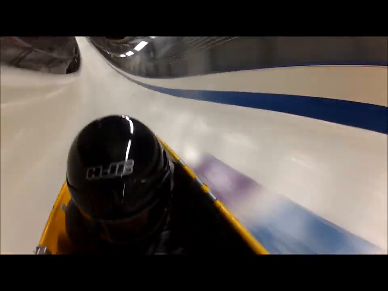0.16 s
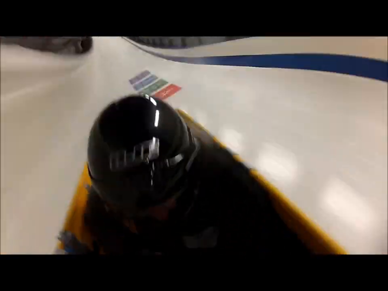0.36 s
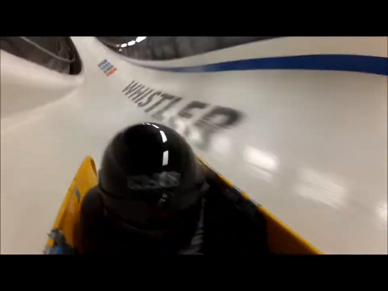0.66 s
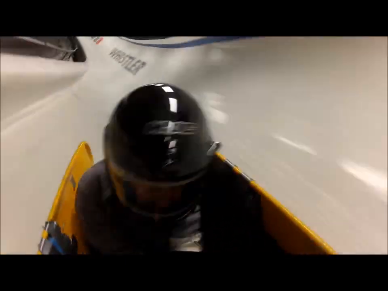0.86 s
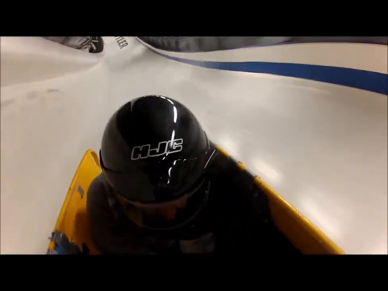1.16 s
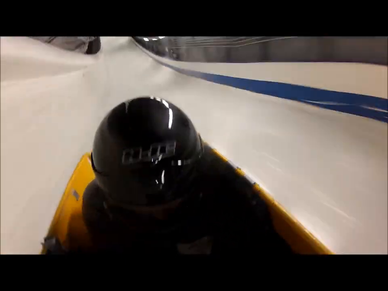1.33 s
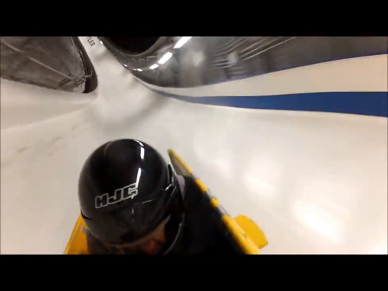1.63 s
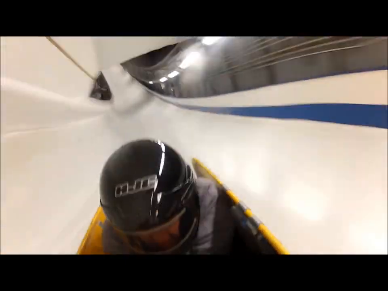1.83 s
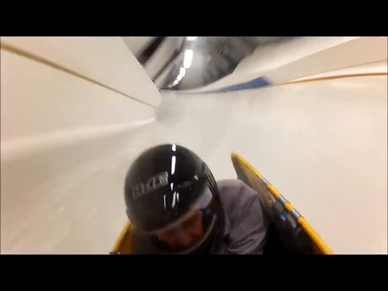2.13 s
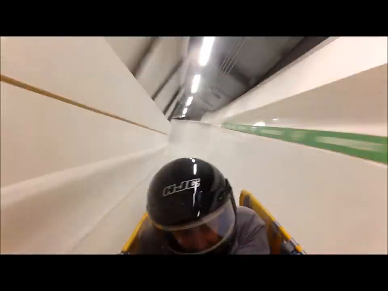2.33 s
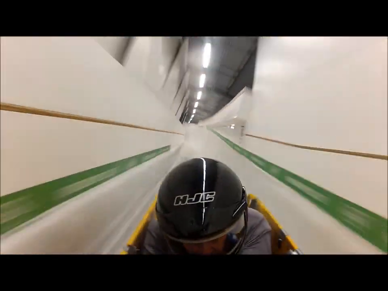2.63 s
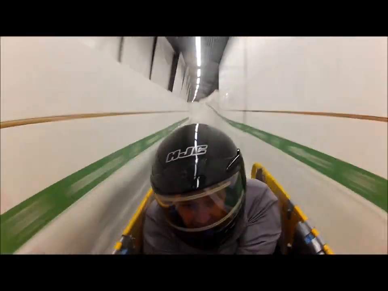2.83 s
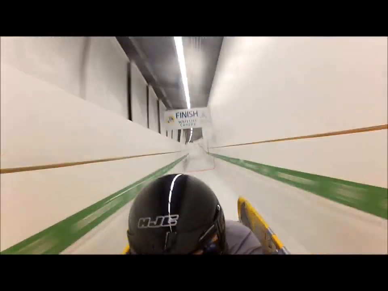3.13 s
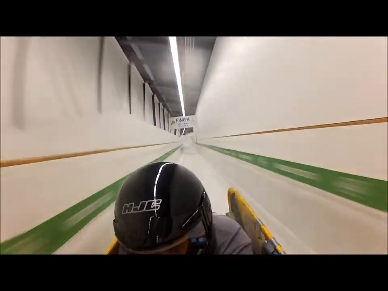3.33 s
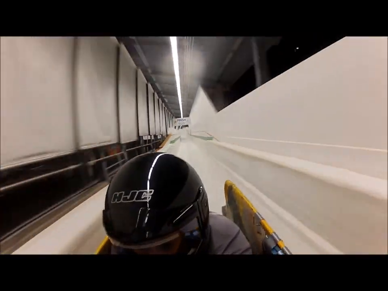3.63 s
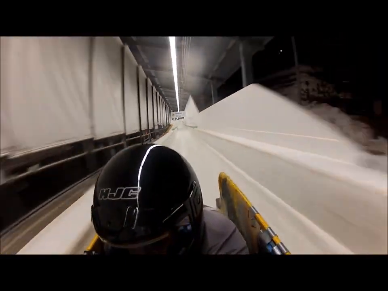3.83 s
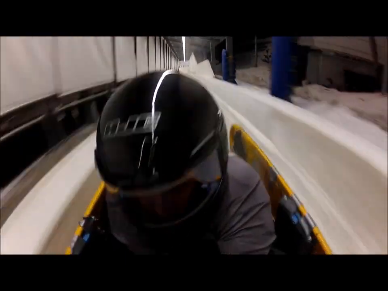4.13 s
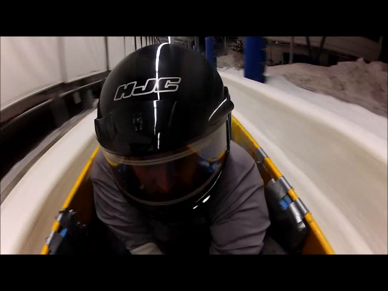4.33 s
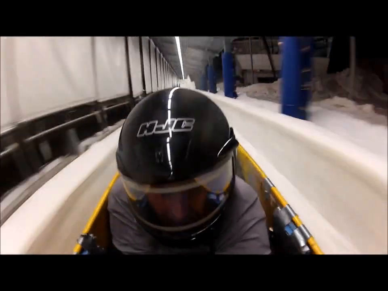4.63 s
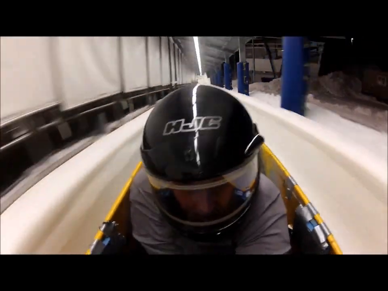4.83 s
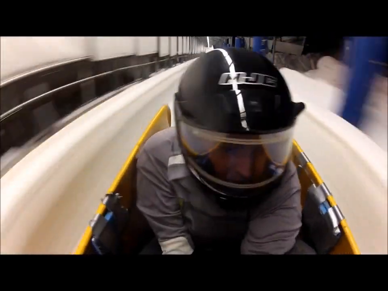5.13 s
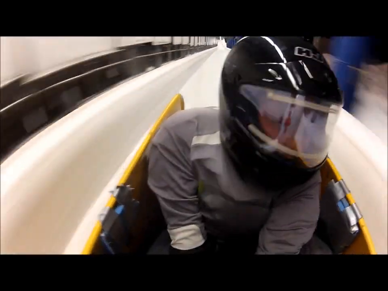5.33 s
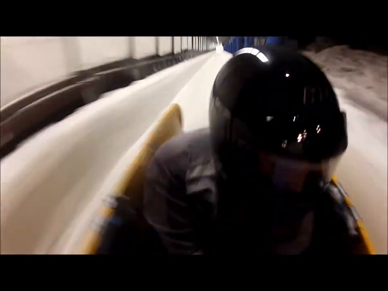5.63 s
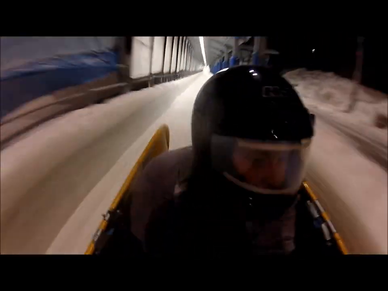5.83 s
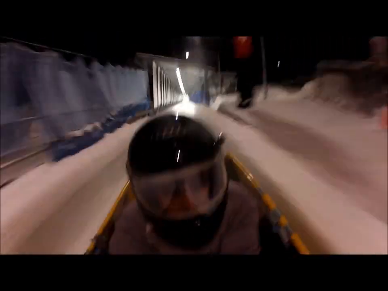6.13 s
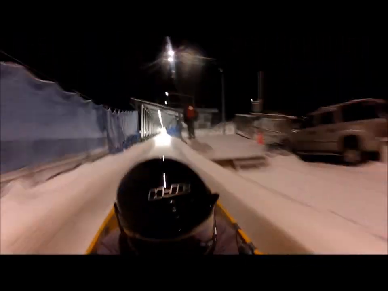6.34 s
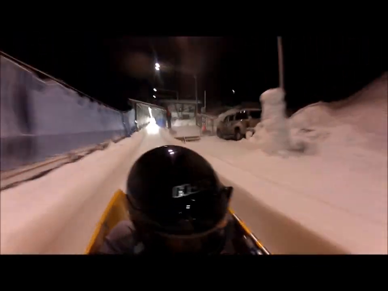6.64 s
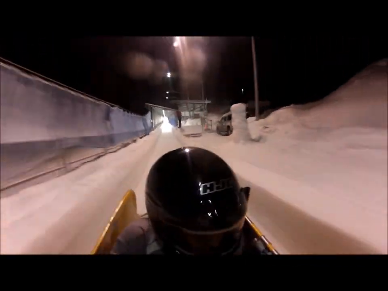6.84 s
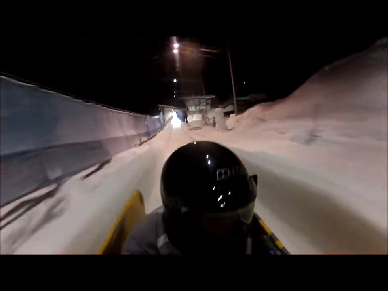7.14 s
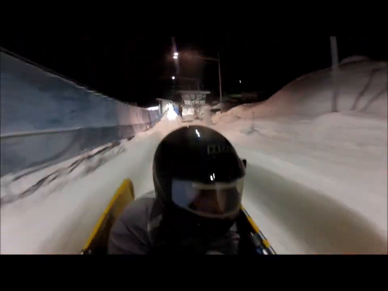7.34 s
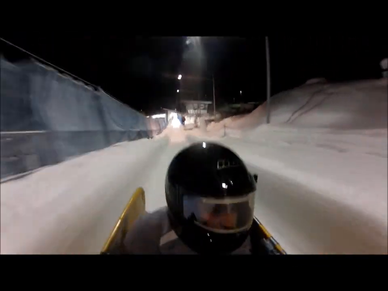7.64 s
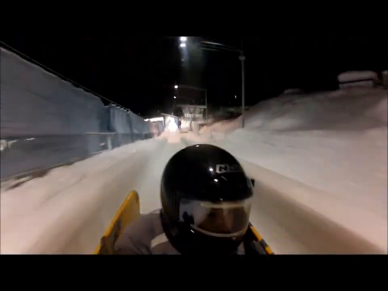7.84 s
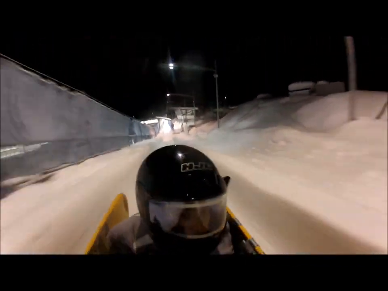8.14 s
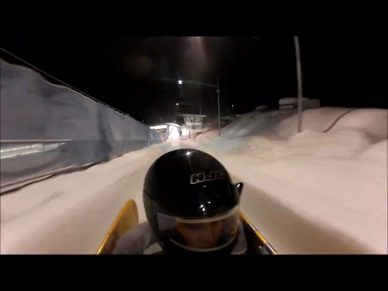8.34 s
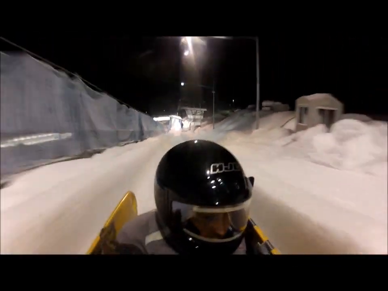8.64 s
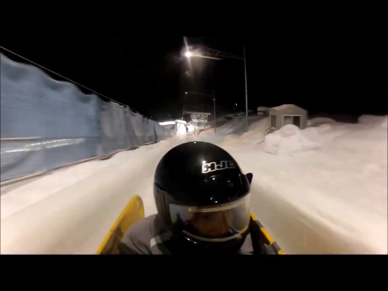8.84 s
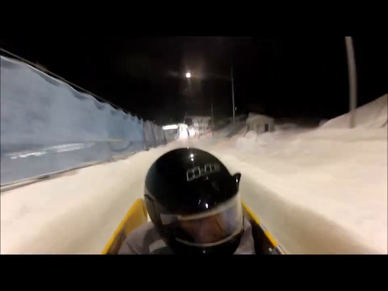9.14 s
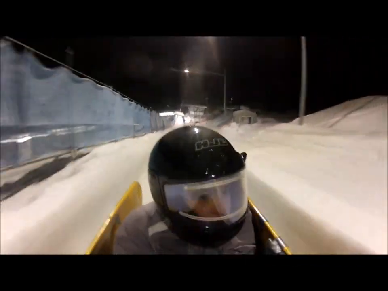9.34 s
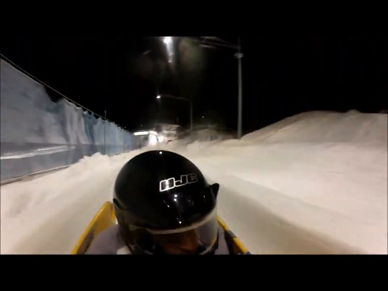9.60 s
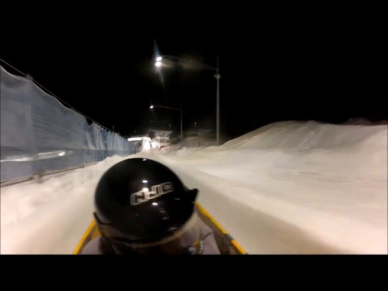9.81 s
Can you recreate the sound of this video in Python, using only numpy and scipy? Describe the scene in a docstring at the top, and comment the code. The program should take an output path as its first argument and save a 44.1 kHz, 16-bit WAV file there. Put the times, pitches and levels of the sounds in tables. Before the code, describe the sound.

Steel sled runners scrape and roar down an ice track, heavy knocks slamming the hull, then the rush eases into a gritty, crackling slow slide.

```python
"""Steel runners of a bobsled scrape, ring and spray as it races down an ice track and slows: shaped friction noise.
Place and microphone: on board, one small camera riding with the sled; both channels are alike.
The hull booms near 82 Hz (narrow noise) and bumps knock it hard (noise cracks and damped modes).
Squeaks and single cracking crumbs of ice join in (resonant noise, grains), and late thin device tones (sines).
Hard knocks overload the microphone: its gain ducks, holds and creeps back, and what slips past clips."""
import sys
import numpy as np
from scipy import signal
from scipy.fft import rfft, irfft, next_fast_len
from scipy.io import wavfile
from scipy.ndimage import uniform_filter1d, minimum_filter1d, map_coordinates

SR = 44100
rng = np.random.default_rng(int(sys.argv[2]) if len(sys.argv) > 2 else 0)


def inscribe(sig):
    """Save sig as 16-bit PCM at rate SR to the path in sys.argv[1].

    A 1-D sig is mono; a 2-D sig holds one channel per row.
    Samples are clipped to [-1, 1] before scaling.
    """
    pcm = np.round(np.clip(np.atleast_2d(sig).T, -1, 1) * 32767)
    wavfile.write(sys.argv[1], SR, pcm.astype(np.int16))


N = 439677


def amp(db):
    """Decibels to gain."""
    return 10 ** (np.asarray(db) / 20)


def unit(x):
    """x at rms 1."""
    return x / np.sqrt(np.mean(x ** 2) + 1e-20)


def noise(shape=N):
    """White noise."""
    return rng.standard_normal(shape)


def curves(rows):
    """One value per sample for each column after the time."""
    times, *columns = np.transpose(rows)
    return [np.interp(np.arange(N) / SR, times, column) for column in columns]


def wobble(rate):
    """A smooth random curve, rate knots a second."""
    knots = noise(int(N * rate / SR) + 4)
    return map_coordinates(knots, [np.arange(N) * rate / SR])


def swells(rows, edge=2.6):
    """A rise in dB over each (middle, length, dB) stretch; a higher edge makes its flanks steeper."""
    t = np.arange(N) / SR
    return sum(db * np.exp(-np.abs(2 * (t - s) / length) ** edge) for s, length, db in rows)


def filtered(x, response):
    """x times a response of frequency."""
    size = next_fast_len(len(x) + 8192)
    hz = np.fft.rfftfreq(size, 1 / SR)
    return irfft(rfft(x, size) * response(hz), size)[:len(x)]


def coloured(x, spectrum):
    """x shaped by (Hz, dB) points, at rms 1."""
    hz, db = np.transpose(spectrum)
    return unit(filtered(x, lambda f: amp(np.interp(np.log(f + 1), np.log(hz), db))))


def resonant(x, peaks):
    """x through (Hz, width, dB) resonances, at rms 1."""
    def response(f):
        return sum(amp(db) * 1j * f * width / (centre * centre - f * f + 1j * f * width)
                   for centre, width, db in peaks)
    return unit(filtered(x, response))


def ringing(modes, t):
    """Damped sines from (Hz, dB, t60) modes."""
    return sum(amp(db - 60 * t / t60) * np.sin(2 * np.pi * hz * t) for hz, db, t60 in modes)


def crunch(rate, share):
    """Friction noise: a smooth rush plus chips of breaking ice, rate a second, with a share of the power."""
    chips = (rng.random(N) < rate / SR) * rng.uniform(-1.07, 1, N)
    share = np.clip(share, 0, 1)
    return np.sqrt(1 - share) * noise() + np.sqrt(share) * unit(chips)


def steady(x, size=6615):
    """x with its swells evened out over 0.15 s."""
    return x / np.sqrt(np.abs(uniform_filter1d(x ** 2, size)) + 1e-9)


def patchy(x, depth_db):
    """x with short random patches of gain, each about 1 kHz wide and 15 ms long, at rms 1."""
    z = signal.stft(x, nperseg=256)[2]
    field = uniform_filter1d(noise(z.shape), size=6, axis=0)
    field = uniform_filter1d(field, size=5, axis=1)
    return unit(signal.istft(z * amp(depth_db * unit(field)))[1][:N])


def add(track, s, sound):
    """Mix a sound into the track at time s."""
    part = track[round(s * SR):][:len(sound)]
    part += sound[:len(part)]


# change of the runners from racing to slow sliding: (time [s], share [0-1])
SLOWING = [(0, 0), (5, 0.23), (6.5, 0.3), (7.8, 0.61), (9, 0.8)]


def slowness():
    """0 while racing, 1 at a slow slide."""
    return np.clip(curves(SLOWING)[0], 0, 1)


# base level of the runners' scrape on smooth ice: (time [s], level [dB])
GLIDE = [(0, -19.5), (2, -21.5), (3.7, -23), (6.2, -24), (7.2, -27.5), (8.6, -30.5), (9, -28.5), (10, -28)]
# stretches of rough ice: (middle [s], length [s], rise before a layer's share [dB])
ROUGH_ICE = [(.04, 0.13, 3.5), (.52, 0.17, 5.5), (1.4, 0.53, 6), (2.92, 0.1, 4.5), (4.3, .24, 13),
             (4.58, 0.32, 12.5), (5.53, 0.86, 12.5), (6.62, 0.09, 6)]


def level_db(law):
    """A layer's level: it follows the glide, fades as the sled slows and rises on rough ice."""
    over_db, slow_loss_db, rough_share = law
    return curves(GLIDE)[0] + over_db - slow_loss_db * slowness() + rough_share * swells(ROUGH_ICE)


# grit against the glide: (offset [dB], loss at a full slow-down [dB], share of the rough ice's rise)
GRIT_LAW = (-7, 6.2, 0.025)
# sideways skids that shave more grit off the ice: (middle [s], length [s], rise [dB])
SKIDS = [(2.98, 0.66, 5.5), (4.27, 0.18, 5.5), (4.57, 0.29, 3.5), (4.88, 0.085, 9), (5.42, 0.5, 5.5),
         (5.69, 0.094, 9), (7.92, 0.65, 5), (9.1, .24, 2.5), (9.7, 0.67, 5.5)]


def grit_level_db():
    """The grit follows the glide and rises where the sled skids sideways."""
    return level_db(GRIT_LAW) + swells(SKIDS)


# thin tones of the device, 2 kHz and its odd multiples: (frequency [Hz], level [dB])
DEVICE_TONES = [(2000, -30.5), (6000, -44), (10000, -45.5), (14000, -47)]


def device_tones(skirt_db=-9):
    swell, = curves([(8.55, 0.074), (8.8, 1), (9.5, 1), (9.75, 0.71), (10, 0.74)])
    flutter = resonant(noise(), [(83.6, 16, 0)])
    flutter = flutter + amp(skirt_db) * coloured(noise(), [(60, 2), (250, -6), (900, -40)])
    t = np.arange(N) / SR
    tones = sum(amp(db) * np.sin(2 * np.pi * hz * t) for hz, db in DEVICE_TONES)
    return swell * flutter * tones


def crumbs(count=110, start_s=6, over_grit_db=-0.5, spread_db=3, centre_hz=3600, life_s=0.0035):
    """At low speed single crumbs of ice crack under the runners, each at its own pitch, louder on gritty ice."""
    track, t = np.zeros(N), np.arange(SR // 40) / SR
    shape = t / life_s * np.exp(1 - t / life_s)
    grit_db = grit_level_db()
    for when, size, pitch in rng.random((count, 3)):
        s = start_s + when * (N / SR - start_s)
        # up to an octave either side of the centre
        hz = centre_hz * 2 ** (2 * pitch - 1)
        spectrum = [(hz / 3, -30), (hz / 2.3, -8), (hz, 0), (hz * 1.3, -9), (hz * 4, -26)]
        grain = coloured(noise(len(t)), spectrum)
        grain_db = grit_db[int(s * SR)] + over_grit_db + spread_db * (2 * size - 1.0)
        add(track, s, amp(grain_db) * shape * grain)
    return track


# steel catching on the ice; narrow ones squeak, wide ones scratch:
# (time [s], level [dB], frequency [Hz], width [Hz])
SQUEAKS = [(2.799, -18, 4050, 300), (2.822, -20.5, 4080, 600), (3.249, -23, 3670, 2000),
           (4.199, -18, 4470, 170), (4.864, -19, 3140, 2500), (5.671, -21, 3470, 2000),
           (5.785, -27, 4470, 200), (6.303, -26.5, 3620, 2000), (6.434, -20, 4340, 200),
           (6.585, -17.5, 2470, 800), (6.695, -21, 2800, 2000), (6.727, -26, 3930, 400),
           (7.204, -20, 4420, 150), (8.167, -21, 1410, 600), (9.07, -29, 3500, 2500),
           (9.143, -25.5, 3280, 2000), (9.67, -26.5, 3060, 2500)]


def squeaks(rise_s=0.0061, upper_hz=7650, upper_db=-8, clean_hz=230):
    """Steel sticks and slips for a moment, in one rough mode and the edge's high overtone."""
    track, t = np.zeros(N), np.arange(SR // 10) / SR
    shape = (t / rise_s) ** 2 * np.exp(2 - 2 * t / rise_s)

    def rough_mode(hz, width):
        narrow = resonant(noise(len(t)), [(hz, width, 0)])
        return resonant(narrow, [(hz, 4 * width, 0)])

    for s, db, hz, width in SQUEAKS:
        low = rough_mode(hz, width)
        high = rough_mode(upper_hz, width)
        # only a clean squeak, close under the overtone, drives it well
        drive = amp(upper_db) * (2 * hz / upper_hz) ** 2 * np.sqrt(clean_hz / width)
        add(track, s, amp(db) * shape * (low + drive * high))
    return track


# bumps in the track: (time [s], hull swing [dB], crack before a 9 dB cut [dB],
# strongest ring [Hz], dull panel knock [dB])
BUMPS = [(0.1301, 2, 9.5, 1810, -7), (0.75, -1.5, -22, 1220, -22), (0.853, 10, 10, 1744, -5),
         (1.7493, 11.5, 12, 1240, -2), (2.021, 6, 11, 1780, -1), (2.064, 8, 3, 1700, -24),
         (2.3695, 5.5, 6, 2140, -9.5), (2.417, 11.5, 5, 2250, -21), (2.464, 0.5, 0, 1540, -24),
         (2.512, -1.5, -4, 1570, -16), (2.566, 6.5, -11, 1300, -19), (2.621, 12, -8, 1300, -23),
         (2.691, 5, -17, 1310, -32), (4.292, -12, -24, 1800, -10.5), (4.357, -3.5, -26, 1800, -14),
         (5.172, 6.5, -20, 1200, -18), (5.574, -1.5, -27, 1700, -24), (5.821, -3, -23, 1700, -25),
         (7.5405, 8, 6, 1186, 0)]
# the hull's low modes: (frequency [Hz], level [dB], t60 [s])
HULL_MODES = [(82.6, 2.5, 0.22), (39.5, -11.5, 0.13), (136.5, -6, 0.076), (202, -18, 0.055),
              (273, -20.5, 0.072)]
# the body panel's short modes: (frequency [Hz], level [dB], t60 [s])
PANEL_MODES = [(383, -3.5, 0.019), (614, -9.5, 0.023)]
# the frame's answer to a blow: (frequency [Hz], relative level [dB per Hz])
FRAME_SPECTRUM = [(80, -4), (180, 2.5), (400, -9), (750, -13.5), (1200, -0.5), (2200, 1.5), (2800, -11.5),
                  (3600, -6.5), (6000, -41), (8400, -13), (15000, -26.5)]
# the shell's dull thud under a blow: (frequency [Hz], relative level [dB per Hz])
THUD_SPECTRUM = [(25, -14), (60, -2), (130, 0), (250, -11), (450, -12), (900, -44)]


def bumps(crack_s=0.0056, tail_db=-22, tail_t60=0.076, ring_db=2, ring_t60=0.025,
          give_s=0.0044, thud_db=0, thud_t60=0.064):
    """Each bump cracks briefly through the frame, thuds in the shell and panel and sets the hull swinging."""
    track, t = np.zeros(N), np.arange(SR // 2) / SR
    # the heavy hull gives way more slowly than the frame
    give = 1 - np.exp(-t / give_s)
    swing = -give * ringing(HULL_MODES, t)
    contact = np.exp(-(t / crack_s) ** 4) + amp(tail_db - 60 * t / tail_t60)
    thud_decay = amp(thud_db - 60 * t / thud_t60)
    panel = ringing(PANEL_MODES, t)
    for s, swing_db, crack_db, hz, panel_db in BUMPS:
        crack = contact * coloured(noise(len(t)), FRAME_SPECTRUM)
        crack = crack + ringing([(hz, ring_db, ring_t60)], t)
        thud = give * thud_decay * coloured(noise(len(t)), THUD_SPECTRUM)
        knock = amp(swing_db) * swing + amp(crack_db - 9) * crack + amp(panel_db) * (panel + thud)
        add(track, s, knock)
    return track


# hull boom and low rumble against the glide:
# (offset [dB], loss at a full slow-down [dB], share of the rough ice's rise)
BOOM_LAW = (-0.25, 0.81, 0.49)
RUMBLE_LAW = (-8, 0, 1)
# dips in the track that load the hull and make it boom: (middle [s], length [s], rise [dB])
DIPS = [(.03, 0.12, 4.5), (.83, 0.28, 11.5), (2.7, .2, 10), (3.46, 0.12, 7), (4.56, 0.11, 5.5),
        (4.99, 0.1, 8), (5.69, .26, 8.5), (6.78, 0.1, 7.5), (8.03, 0.11, 5)]
# their spectra: (frequency [Hz], relative level [dB per Hz])
BOOM_SPECTRUM = [(15, -27), (25, -26), (40, -9), (62, -14), (73, -11.5), (82, 6.5), (91, -7.5),
                 (110, -19.5), (150, -24.5), (250, -57)]
RUMBLE_SPECTRUM = [(59, -40), (100, -8), (113, -3), (134, -8), (227, -11), (294, -12), (496, -21.5),
                   (600, -25.5), (696, -33), (800, -33.5), (1040, -53), (1760, -120)]


def hull(load_db):
    """Uneven ice shakes the hull: dips make it boom, and rough ice raises its rumble most."""
    boom_db = level_db(BOOM_LAW) + swells(DIPS) + 1.35 * wobble(11)
    rumble_db = level_db(RUMBLE_LAW) + 1.0 * wobble(9)
    boom = amp(boom_db) * steady(coloured(noise(), BOOM_SPECTRUM))
    rumble = amp(rumble_db + load_db) * coloured(crunch(rate=150, share=0.32), RUMBLE_SPECTRUM)
    return boom + rumble


# scrape against the glide: (offset [dB], loss at a full slow-down [dB], share of the rough ice's rise)
SCRAPE_LAW = (-0.57, 0, 0.41)
# level of the runners' ring: (time [s], level [dB])
SINGING = [(0, -26.5), (1, -26.5), (1.5, -24.5), (2.3, -32.5), (4, -30), (5.1, -28.5), (5.4, -40),
           (6.1, -33), (7.4, -39.5), (10, -50.5)]
# the runners' ring, then that of the slow slide: (frequency [Hz], width [Hz], relative level [dB])
RUNNER_MODES = [(289, 71, -11.5), (594, 55, -9.5), (908, 31.7, 0)]
SLOW_RUNNER_MODES = [(267, 34, 3.5), (592, 20, 2.5), (1340, 41, 1), (5430, 800, -20)]
# the steel's high modes: (frequency [Hz], width [Hz], relative level [dB])
EDGE_MODES = [(3680, 520, 0.5), (4480, 110, -0.5), (7540, 190, -5.5), (8330, 280, -2.5), (9900, 630, -6.5),
              (10700, 77, -10)]
# spectra of the scrape at speed, the slow scrape, the grit and the fine ice spray:
# (frequency [Hz], relative level [dB per Hz])
RACING_SPECTRUM = [(410, -37), (700, -14.5), (795, -10), (910, -8.5), (996, -7), (1270, -2), (1460, -8.5),
                   (1740, -1), (2030, -4), (2320, -2.5), (2840, -18.5), (3000, -16), (3900, -26),
                   (6600, -120)]
SLIDING_SPECTRUM = [(410, -54), (700, -26), (851, -15), (882, -15.5), (1010, -30), (1120, -3), (1290, -0.5),
                    (1370, -1), (1450, -11), (1580, 0.5), (1800, -1.5), (1890, -0.5), (2150, -2),
                    (2320, -3), (3000, -21.5), (3900, -42), (6600, -120)]
GRIT_SPECTRUM = [(1530, -8), (2600, -3.5), (2920, -5.5), (3570, -1), (4190, -6.5), (4550, -6.5),
                 (4890, -11.5), (5340, -11), (5910, -32), (6200, -52.5), (8060, -34), (13600, -120)]
SPRAY_SPECTRUM = [(3530, -30), (6000, -8), (7340, -6), (8320, -3), (9010, -7), (9900, 1.5), (10500, -3.5),
                  (11500, -14.5), (11600, -23), (12300, -16), (13400, -7.5), (14000, 0.5), (14700, -8),
                  (15400, -12.5)]


def runners(load_db):
    """Steel rubbing on ice scrapes, rings, grinds off grit and throws spray."""
    slow = slowness()
    scrape_db = level_db(SCRAPE_LAW) + .5 * wobble(9.6)
    grit_db = grit_level_db() + .5 * wobble(7.1)
    # the slower the sled, the more the edges bite in separate chatters
    bite_db = (0.73 + 1.3 * slow) * (wobble(45) + wobble(220))

    racing = patchy(coloured(crunch(rate=700, share=0.21), RACING_SPECTRUM), depth_db=1.07)
    sliding = patchy(coloured(crunch(rate=500, share=0.13), SLIDING_SPECTRUM), depth_db=1.8)
    sliding = sliding + amp(-9.5) * resonant(noise(), SLOW_RUNNER_MODES)
    # crossfade in power from racing to sliding
    scrape = amp(scrape_db + load_db) * (np.sqrt(1 - slow) * racing + np.sqrt(slow) * sliding)

    ring = amp(curves(SINGING)[0] + load_db) * resonant(noise(), RUNNER_MODES)
    grinding = patchy(coloured(crunch(rate=450, share=0.085), GRIT_SPECTRUM), depth_db=1.5)
    grit = amp(grit_db + load_db + bite_db) * grinding

    # spray grows with both scrape and grit, and rings the steel's high modes
    fizz = coloured(crunch(rate=1500, share=0.3), SPRAY_SPECTRUM)
    fizz = fizz + amp(-4.0) * resonant(noise(), EDGE_MODES)
    spray = amp((scrape_db + grit_db) / 2 - 6.0 + load_db + bite_db) * fizz
    return scrape + ring + grit + spray


def gliding():
    """The load on the runners flutters, and the rumble and all friction follow it together."""
    load_db = 1.04 * wobble(22) + 0.58 * wobble(130)
    return hull(load_db) + runners(load_db)


def scene():
    """All the sled's sounds reach one microphone on board; the device adds its tones."""
    sled = crumbs() + squeaks() + bumps() + gliding()
    mono = device_tones() + sled
    return np.array([mono, mono])


def bass_image(x, hz=12000, db=-31):
    """The recorder's faint image of the bass around 12 kHz, strongest under heavy thumps."""
    bass = filtered(x, lambda f: 1 / (1 + (f / 150) ** 4))
    return amp(db) * bass * np.sin(2 * np.pi * hz * np.arange(N) / SR)


def auto_gain(x, ceiling_db=-1.0, bass_db=-4, attack_s=0.0036, release_db_per_s=68, hold_size=1601):
    """Peaks over the ceiling pull the gain down within milliseconds; it holds, then creeps back."""
    # the detector is a little deaf to bass, so heavy thumps clip
    sensed = filtered(x.mean(axis=0), lambda hz: amp(bass_db / (1 + (hz / 250) ** 2)))
    over_db = np.maximum(20 * np.log10(np.abs(sensed) + 1e-9) - ceiling_db, 0)
    # highest overshoot of the last 36 ms
    held_db = -minimum_filter1d(-over_db, hold_size, origin=hold_size // 2)
    # a running maximum on a rising ramp lets the cut fall only at the release rate
    ramp_db = release_db_per_s * np.arange(N) / SR
    cut_db = np.maximum.accumulate(held_db + ramp_db) - ramp_db
    pole = np.exp(-1 / (attack_s * SR))
    return x * amp(-signal.lfilter([1 - pole], [1, -pole], cut_db))


# bands the camera housing swallows: (centre [Hz], width [Hz], gain [dB])
HOUSING = [(6015, 360, -8.5), (11770, 720, -6.5)]


def housing(hz):
    """The housing's gain at each frequency: a smooth notch in each band."""
    return amp(sum(db * np.exp(-((hz - centre) / width) ** 2) for centre, width, db in HOUSING))


# the sound cuts out briefly: (start [s], end [s])
CUT_OUT = (6.932, 6.996)
TOP_HZ = 15400  # nothing is heard from here up


def record(dry):
    """Gain control, clipping, a brief cut-out, a faint 12 kHz image of the bass, the housing and the band limit."""
    t = np.arange(N) / SR
    live = np.where((t > CUT_OUT[0]) & (t < CUT_OUT[1]), amp(-44.5), 1)
    wet = auto_gain(dry).mean(axis=0)
    wet = live * wet / (1 + wet ** 8) ** (1 / 8)
    mono = filtered(wet + bass_image(wet), lambda hz: housing(hz) * (hz < TOP_HZ))
    return np.array([mono, mono])


dry = scene()
out = record(dry)
inscribe(out)
```